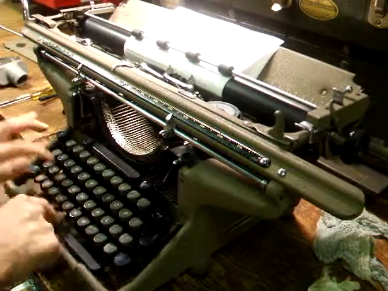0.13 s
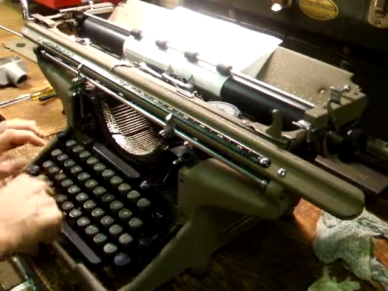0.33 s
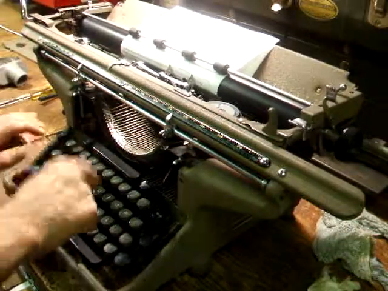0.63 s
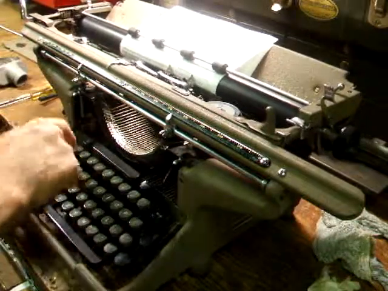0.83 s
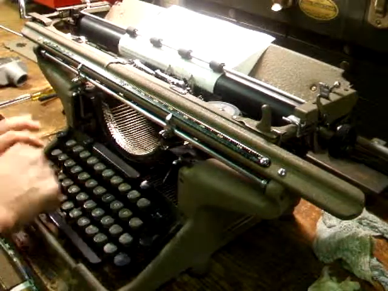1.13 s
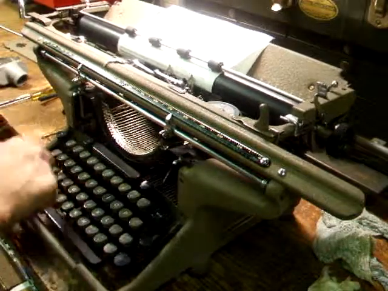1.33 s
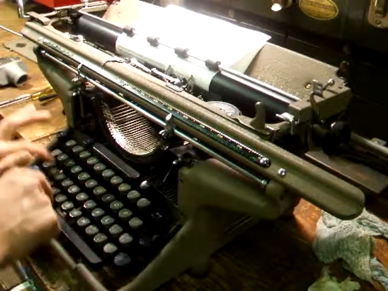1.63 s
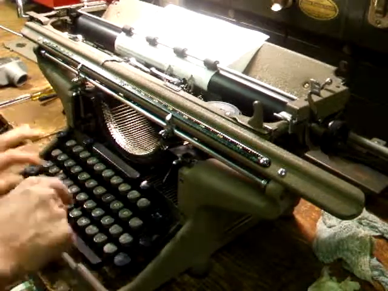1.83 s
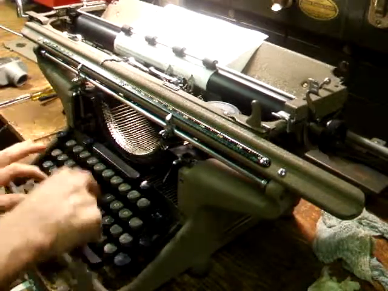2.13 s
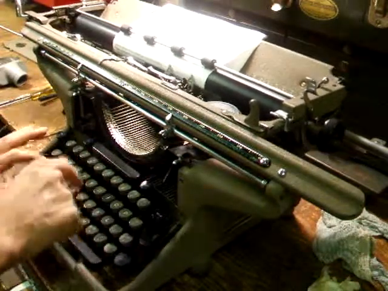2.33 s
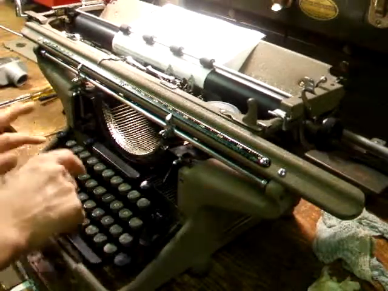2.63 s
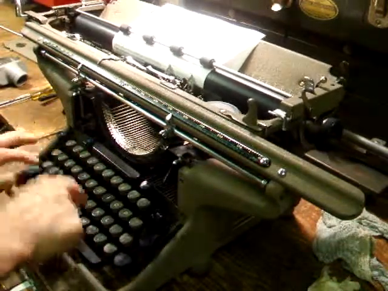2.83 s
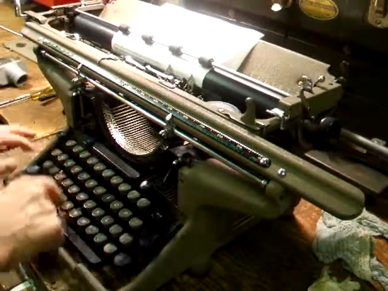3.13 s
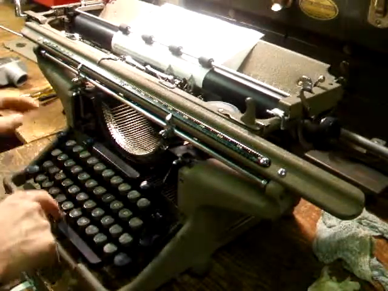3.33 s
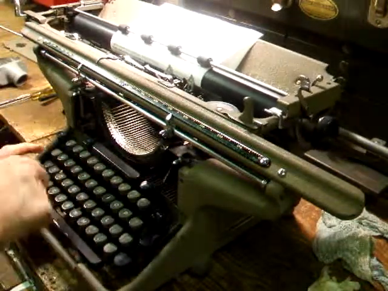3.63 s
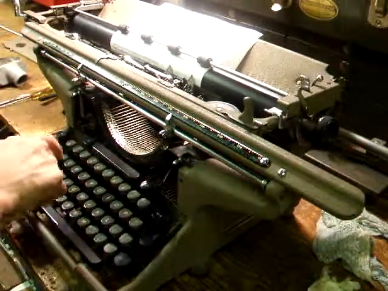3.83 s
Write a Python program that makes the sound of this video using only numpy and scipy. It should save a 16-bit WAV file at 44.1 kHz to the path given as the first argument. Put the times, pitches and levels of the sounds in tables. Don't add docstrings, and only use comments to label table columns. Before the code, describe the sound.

In a quiet workshop, a heavy old typewriter is typed on by hand; hard bright steel cracks come unevenly, with loose linkages rattling and the hollow frame thumping softly, ending on a light clatter without a strike.

```python
import sys
import numpy as np
from scipy import signal
from scipy.fft import rfft, irfft
from scipy.io import wavfile
from scipy.ndimage import uniform_filter1d

SR = 44100
rng = np.random.default_rng(int(sys.argv[2]) if len(sys.argv) > 2 else 0)


def bounce(signal):
    frames = np.transpose(np.atleast_2d(signal))
    limited = np.clip(frames, -1, 1)
    pcm = np.round(limited * 32767).astype(np.int16)
    wavfile.write(sys.argv[1], SR, pcm)


def volts(x):
    e = np.asarray(x, float) / 20
    return 10 ** e


N = 176400

# (time [s], peak [dB], treble [dB], lever ring [Hz], chatter length [s])
KEY_CLICKS = [(0.086, -14, 4.5, 7090, 0.012), (0.184, -11.5, 5, 7200, 0.0034),
              (0.5109, -13, 3.5, 4300, 0.0035), (0.633, -17, 2, 7160, 0.0062),
              (0.6453, -12, -2.5, 5100, 0.0052), (0.8491, -13.5, -0.5, 4060, 0.0034),
              (1.0435, -14.5, -0.5, 4250, 0.0055), (1.0484, -21, 8, 5300, 0.0058),
              (1.1863, -14.5, -1.5, 4790, 0.0065), (1.1966, -16, 1, 7200, 0.0055),
              (1.535, -13.5, 6, 7100, 0.0037), (1.7126, -14.5, -1, 4300, 0.0081),
              (2.102, -15.5, -0.5, 7170, 0.0033), (2.1037, -17.5, 2.5, 3400, 0.0052),
              (2.3217, -12.5, 0, 3980, 0.0045), (2.602, -12.5, 4, 7500, 0.0049),
              (3.037, -14, 1, 7300, 0.0032)]
# (time [s], peak [dB], treble [dB], lever ring [Hz], chatter length [s])
BAR_RETURNS = [(0.3261, -10.5, 2, 4350, 0.011), (0.61, -22, -3, 3880, 0.0093),
               (0.7847, -20.5, -3.5, 5220, 0.006), (0.9765, -11.5, 2, 5830, 0.006),
               (1.3174, -10, 3.5, 4780, 0.0046), (1.398, -25, -4, 5900, 0.006),
               (1.6753, -18, -2.5, 4520, 0.0049), (1.8512, -15, 1, 4820, 0.0071),
               (2.2377, -15, -3, 2930, 0.0076), (2.4536, -12, 2, 3780, 0.0065),
               (2.7614, -12.5, 0.5, 5080, 0.0053), (3.1592, -12.5, 13, 1960, 0.0057),
               (3.1598, -11.5, 2, 4930, 0.0043), (3.7277, -16, 6, 4470, 0.0076),
               (3.7351, -13.5, -1.5, 7900, 0.0084)]
STRIKE = 512


def unit(x):
    return x / np.sqrt(np.mean(x ** 2, axis=-1, keepdims=True))


def unit_energy(x):
    return x / np.sqrt(np.sum(x ** 2, axis=-1, keepdims=True))


def on_log_hz(points, size):
    hz, db = np.array(points, float).T
    bin_hz = np.maximum(np.arange(size // 2 + 1) * SR / size, 1)
    return np.interp(np.log(bin_hz), np.log(hz), db)


def colour(x, points):
    size = x.shape[-1]
    return irfft(rfft(x) * volts(on_log_hz(points, size)), size)


def fade(t, t60_s):
    return np.exp(-np.log(1000) * t / t60_s)


def butter(x, order, hz, kind="low"):
    return signal.sosfilt(signal.butter(order, hz, kind, fs=SR, output="sos"), x)


def add(out, times_s, rows, early=0):
    for s, row in zip(times_s, rows):
        i = int(s * SR) - early
        a, b = max(-i, 0), min(len(row), len(out) - i)
        out[i + a:i + b] += row[a:b]


def workshop():
    # (frequency [Hz], density [dB per Hz])
    floor_points = [(20, -15.5), (90, -11.5), (160, -4.5), (400, -11), (1000, -14), (4000, -19.5),
                    (8200, -24), (9500, -54)]
    # (frequency [Hz], level [dB rms])
    hum_lines = [(120.3, -57.5), (211, -56.5), (301.5, -60.5), (1900, -68), (7854, -73), (7985, -77.5),
                 (8118, -72)]
    t = np.arange(N) / SR
    hiss = colour(rng.standard_normal(N), floor_points)
    out = hiss * volts(-51.5) / butter(hiss, 4, [500, 9000], "band").std()
    for hz, db in hum_lines:
        wobble = rng.standard_normal((2, N))
        for _ in range(2):
            wobble = uniform_filter1d(wobble, size=3000)
        level_wobble, phase_wobble = unit(wobble)
        tone = np.sin(2 * np.pi * hz * t + 0.3 * phase_wobble)
        out = out + np.sqrt(2) * volts(db + 1.5 * level_wobble) * tone
    rumble = unit(colour(rng.standard_normal(N), [(12, -6.0), (30, -1.5), (70, -5.0), (140, -37.0)]))
    shake = np.interp(t, [0, 2.7, 3.3], volts([0, -2, -12]))
    return out + volts(-52) * shake * rumble


def frame():
    # (time [s], peak [dB], pitch [Hz], t60 [s])
    frame_thumps = [(0.015, -34.5, 343, 0.086), (0.097, -34, 348, 0.042), (0.188, -32, 347, 0.046),
                    (0.218, -46.5, 323, 0.083), (0.244, -36.5, 307, 0.051), (0.298, -35, 326, 0.065),
                    (0.342, -23.5, 374, 0.046), (0.414, -35, 346, 0.067), (0.449, -34, 363, 0.064),
                    (0.477, -41.5, 368, 0.05), (0.547, -43, 322, 0.06), (0.569, -42, 357, 0.092),
                    (0.614, -32, 352, 0.05), (0.659, -40, 366, 0.067), (0.696, -41, 341, 0.054),
                    (0.758, -44, 342, 0.098), (1.226, -33, 395, 0.029), (1.411, -29, 359, 0.068),
                    (1.5, -33, 363, 0.069), (1.568, -32, 358, 0.042), (1.637, -39.5, 338, 0.038),
                    (1.807, -43, 340, 0.096), (1.916, -21.5, 353, 0.054), (2.003, -37.5, 375, 0.068),
                    (2.03, -32, 335, 0.086), (2.179, -40.5, 384, 0.087), (2.344, -40.5, 384, 0.097),
                    (2.726, -31, 363, 0.051), (3.738, -25, 366, 0.06), (3.812, -28.5, 379.6, 0.063),
                    (3.824, -29, 367, 0.051), (3.837, -27.5, 366, 0.036), (3.851, -33.5, 392, 0.074)]
    # (ratio to the thump pitch [1], level [dB])
    overtones = [(1.005, -1.5), (1.005, -18.5), (1.123, -6), (1.27, -13)]
    push_s = 0.0039
    stroke_thuds = [(row[0], row[1] - 30, 349, 0.06) for row in KEY_CLICKS + BAR_RETURNS]
    rows = np.array(frame_thumps + stroke_thuds, float)
    times_s, peak_db, pitch_hz, t60_s = rows.T
    t = np.arange(8192) / SR
    scatter = volts(2.5 * rng.standard_normal((len(rows), len(overtones))))
    y = np.zeros((len(rows), len(t)))
    for k, (ratio, db) in enumerate(overtones):
        y += volts(db) * scatter[:, k:k + 1] * np.sin(2 * np.pi * ratio * pitch_hz[:, None] * t)
    y = y * fade(t, np.maximum(t60_s[:, None], 0.02)) * (1 - np.exp(-t / push_s)) ** 2
    out = np.zeros(N)
    add(out, times_s, y * (volts(peak_db) / np.abs(y).max(axis=1))[:, None])
    return out


def bench(thumps):
    t = np.arange(16384) / SR
    response = rng.standard_normal(len(t)) * fade(t, 0.72) * np.minimum(t / 0.0021, 1)
    response = response * np.sqrt(14 / (0.35 * SR))
    return volts(-13) * signal.fftconvolve(thumps, response)[:N]


def body(near):
    lag_s, centre_hz, width_hz = 0.035, 349, 80.5
    keep = np.exp(-1 / (lag_s * SR))
    busy = np.sqrt(signal.lfilter([1 - keep], [1, -keep], near ** 2))
    edges_hz = [centre_hz - width_hz / 2, centre_hz + width_hz / 2]
    return volts(-22.5) * busy * unit(butter(rng.standard_normal(N), 2, edges_hz, "band"))


def contact(points):
    c = irfft(on_log_hz(points, 1024) * np.log(10) / 20)
    c[1:512] = 2 * c[1:512]
    c[513:] = 0
    return unit_energy(irfft(np.exp(rfft(c))))


def steel(push, peak_db, treble_db, low_hz, lever_hz=None, lever_t60_s=0.016):
    # (frequency [Hz], level [dB])
    steel_modes = [(1550, -11.5), (2300, -30), (2800, -2.5), (3150, -0.5), (4150, -4), (4850, -30.5),
                   (5300, -5), (6200, 5.5), (7100, 5.5), (7900, -0.5)]
    # (frequency [Hz], density [dB per Hz])
    crack_points = [(300, -26.5), (1000, -15), (1500, -8), (3000, -3), (4200, 0.5), (6500, -7.5),
                    (8000, -8.5), (9500, -35), (12000, -48.5)]
    # (frequency [Hz], density [dB per Hz])
    tail_points = [(300, 4), (800, -8), (1500, -5.5), (3000, -7.5), (5000, -4.5), (7500, -6), (9500, -26),
                   (12000, -56.5)]
    ring_db, scatter_db, lever_db = 0.5, -0.5, -5
    n, t, tail_t = len(push), np.arange(1024) / SR, np.arange(14336) / SR

    hz, db = np.array(steel_modes, float).T
    chance = rng.standard_normal((n, 2, len(hz), 1))
    mode_hz = hz[:, None] * (1 + 0.065 * chance[:, 1])
    modes = volts(db[:, None] + scatter_db * chance[:, 0]) * np.sin(2 * np.pi * mode_hz * t)
    ring = unit_energy(modes.sum(axis=1) * fade(t, 0.011))
    if lever_hz is not None:
        lever = np.sin(2 * np.pi * lever_hz * t) * fade(t, lever_t60_s)
        ring = ring + volts(lever_db - ring_db) * unit_energy(lever)
    direct = signal.fftconvolve(push, contact(crack_points) + volts(ring_db) * ring, axes=1)

    power = np.zeros(len(tail_t))
    for db, t60_s in [(-0.5, 0.23), (-1, 0.041)]:
        power += (volts(db) * fade(tail_t, t60_s)) ** 2 * 14 / (t60_s * SR)
    energy = signal.fftconvolve(push ** 2, power[None], axes=1)[:, :len(tail_t)]
    y = unit(colour(rng.standard_normal((n, len(tail_t))), tail_points)) * np.sqrt(np.maximum(energy, 0))
    grain_db = 1.5 * unit(uniform_filter1d(rng.standard_normal(y.shape), size=90))
    y = y * volts(grain_db)
    y[:, :direct.shape[1]] += direct

    y = butter(y, 2, low_hz, "high")
    low = butter(y, 2, 5500)
    y = low + volts(treble_db)[:, None] * (y - low)
    crest = np.sqrt(6 * uniform_filter1d(y ** 2, size=66).max(axis=1))
    return y * (volts(peak_db) / crest)[:, None]


def chatter(count):
    contacts_per_s, spread_db = 4500, 2.5
    u = rng.random((count, 3, 2048))
    hit, sign = u[:, 0] < contacts_per_s / SR, np.sign(u[:, 1] - 0.5)
    size_db = np.minimum(-spread_db * np.log(1 - u[:, 2]), 3 * spread_db)
    return hit * sign * volts(size_db - spread_db)


def clicks(table, chatter_db, rise_s, low_hz):
    rows = np.array(table, float)
    lever_hz = rows[:, 3:4] if rows.shape[1] > 4 else None
    length_s = np.maximum(rows[:, -1:], 1e-3)
    t = (np.arange(2048) - STRIKE) / SR
    swell = volts(chatter_db) * np.exp(-np.abs(t) / np.where(t < 0, rise_s, length_s))
    main = (t > 0) * np.exp(-np.abs(t) / 0.00044)
    push = chatter(len(rows)) * (swell + main)
    push[:, STRIKE] = 0.8
    out = np.zeros(N)
    add(out, rows[:, 0], steel(push, rows[:, 1], rows[:, 2], low_hz, lever_hz), early=STRIKE)
    return out


def rattles():
    # (time [s], peak [dB], treble [dB], chatter length [s])
    linkage_rattles = [(0.0024, -23, 1.5, 0.022), (0.0436, -24, 1, 0.011), (0.2923, -24.5, -3.5, 0.019),
                       (0.4, -32, 0, 0.0078), (.405, -33, 4, .004), (0.4122, -21.5, -2, 0.0068),
                       (0.4399, -25.5, -2, 0.017), (0.739, -25, -3, 0.0089), (0.962, -24.5, -7, 0.024),
                       (1.165, -25, -6, 0.011), (1.293, -26.5, -6, 0.0071), (1.3865, -41, 2, 0.001),
                       (1.408, -20.5, 2, 0.004), (1.415, -21, 2, 0.01), (1.479, -30, -2, 0.0067),
                       (1.495, -23.5, 0.5, 0.008), (1.5235, -21.5, -2.5, 0.012),
                       (1.6323, -24.5, -2.5, 0.011), (1.8245, -26.5, -3, 0.013), (1.9016, -22.5, -1, 0.01),
                       (1.918, -20, 0, 0.012), (1.9819, -30, -4, 0.016), (1.9984, -25, -1, 0.013),
                       (2.034, -23.5, -2.5, 0.012), (2.209, -25.5, -3, 0.016), (2.435, -26, -3, 0.0083),
                       (2.723, -29, 3, .006), (2.739, -28.5, -2, 0.013), (3.143, -35, -7, 0.0035),
                       (3.0345, -23, 4, .003), (3.1522, -24, -10, 0.008), (3.722, -31, 3, 0.0034),
                       (3.7925, -34, 3, .005), (3.806, -25, -3, 0.0078), (3.811, -26.5, -8, 0.0097),
                       (3.8385, -25.5, -4.5, 0.026)]
    return clicks(linkage_rattles, -0.67, 0.0029, low_hz=690)


def returns():
    return clicks(BAR_RETURNS, -4.5, 0.00017, low_hz=486)


def keys():
    return clicks(KEY_CLICKS, -3.5, 0.00053, low_hz=900)


def slugs():
    # (time [s], peak [dB], treble [dB], type bar ring [Hz], chatter lead [s])
    slug_hits = [(0.114, -2, -1.5, 3980, 0.0043), (0.2206, -2.5, 3, 4760, 0.0066),
                 (0.5404, -2, -1.5, 3970, 0.0079), (0.6671, -2.5, 1, 5300, 0.0074),
                 (0.8753, -0.5, -0.5, 5240, 0.0057), (1.0765, -1.5, -1.5, 6330, 0.0069),
                 (1.226, -2, -0.5, 7300, 0.0083), (1.5719, -3.5, 1, 5060, 0.0063),
                 (1.7462, -1.5, -0.5, 5270, 0.0073), (2.134, -2, -0.5, 4080, 0.0066),
                 (2.3491, -1, -1.5, 3920, 0.0054), (2.6356, -1, 0, 4220, 0.0063),
                 (3.0611, -2, 1.5, 3900, 0.0048)]
    # (delay [s], level [dB])
    slug_bounces = [
        (.0022, -10),
        (0.000899, -11),
    ]
    times_s, peak_db, treble_db, bar_hz, lead_s = np.array(slug_hits, float).T
    t = (np.arange(2048) - STRIKE) / SR
    before = volts(-25) * np.clip((t + lead_s[:, None]) / 0.00034, 0, 1) * (t < 0)
    shake = volts(-28) * np.exp(-np.abs(t) / 0.005)
    blow = volts(-4) * np.exp(-np.abs(t) / 0.0003)
    push = chatter(len(times_s)) * (before + (shake + blow) * (t > 0))
    push[:, STRIKE] = 1
    for delay_s, bounce_db in slug_bounces:
        push[:, STRIKE + int(delay_s * SR)] = volts(bounce_db)
    hits = steel(push, peak_db, treble_db, low_hz=1487, lever_hz=bar_hz[:, None], lever_t60_s=0.008)

    ring_t = np.arange(4096) / SR
    platen = np.sin(2 * np.pi * 1504 * ring_t) * fade(ring_t, 0.046)
    out = np.zeros(N)
    add(out, times_s, volts(peak_db - 25)[:, None] * platen)
    add(out, times_s, hits, early=465)
    return out


def scene():
    room, thumps = workshop(), frame()
    near = rattles() + returns() + keys() + slugs()
    return (room + thumps + bench(thumps) + body(near) + near)[None]


def roll_off(x):
    return signal.sosfilt(signal.butter(12, 15700, fs=SR, output="sos"), x)


def record(dry):
    # (time [s], level [dB], top [Hz])
    overload_ticks = [
        (0.1156, -24, 15900),
        (.6675, -34, 11600),
        (.8768, -24.5, 15900),
        (2.636, -20, 11700),
        (3.061, -46, 11600),
    ]
    ceiling, top_hz, offset = 0.68, 9390, -0.0023
    rounded = ceiling * np.tanh(0.96 * dry / ceiling)
    x = signal.sosfilt(signal.ellip(7, 0.5, 60, top_hz, fs=SR, output="sos"), rounded)
    times_s, db, tick_hz = np.array(overload_ticks).T
    k = np.arange(-128, 129)
    pulses = np.sinc(2 * tick_hz[:, None] * k / SR) * np.hanning(len(k))
    ticks = np.zeros(N)
    add(ticks, times_s, volts(db)[:, None] * pulses, early=128)
    return roll_off(x + ticks + offset)


dry = scene()
out = record(dry)
bounce(out)
```